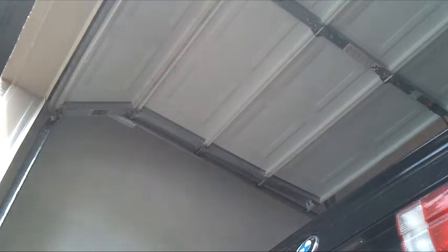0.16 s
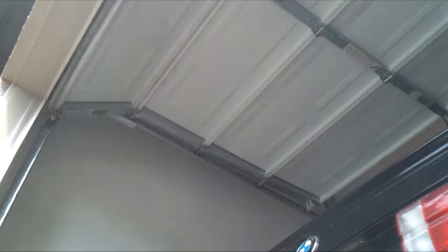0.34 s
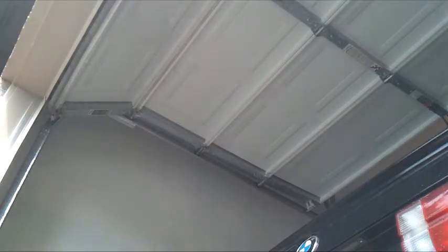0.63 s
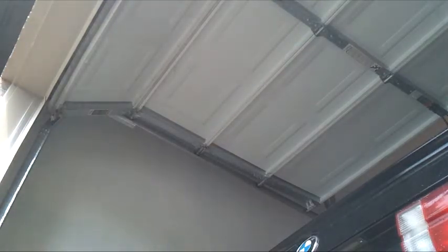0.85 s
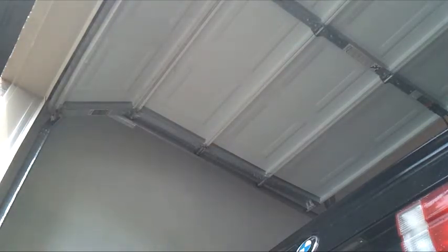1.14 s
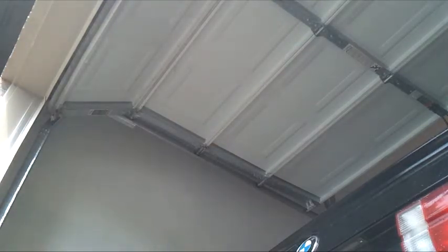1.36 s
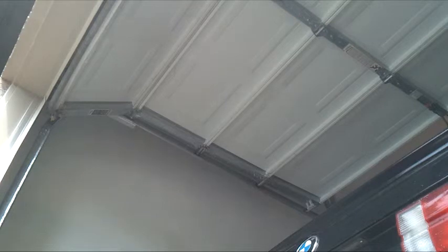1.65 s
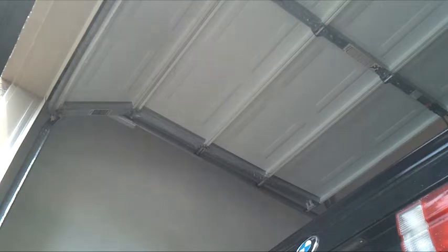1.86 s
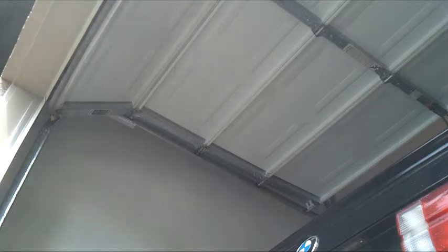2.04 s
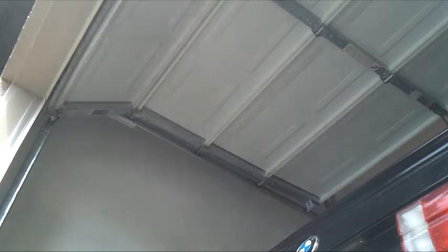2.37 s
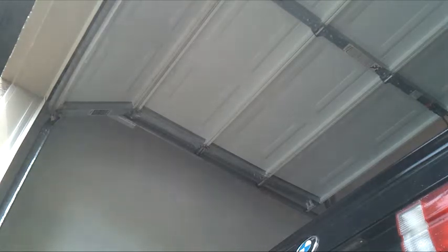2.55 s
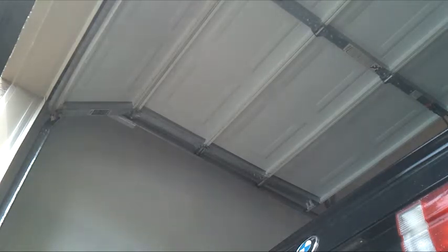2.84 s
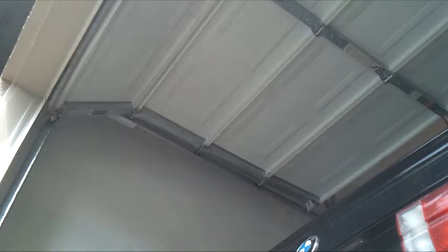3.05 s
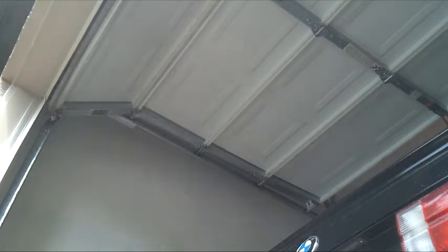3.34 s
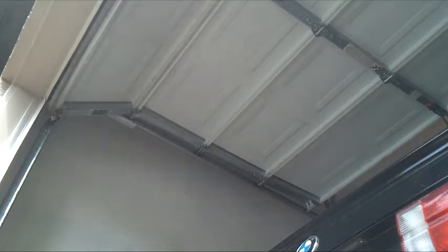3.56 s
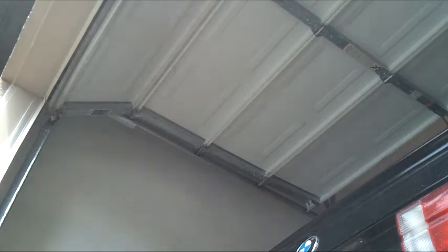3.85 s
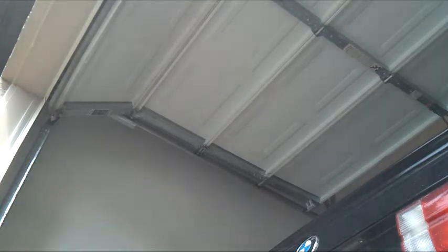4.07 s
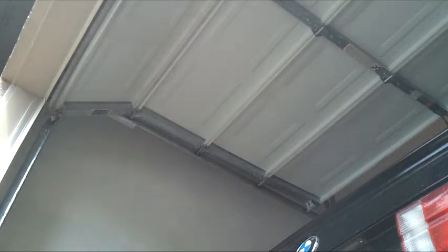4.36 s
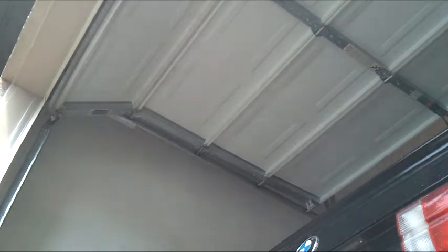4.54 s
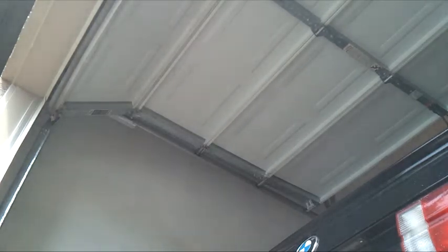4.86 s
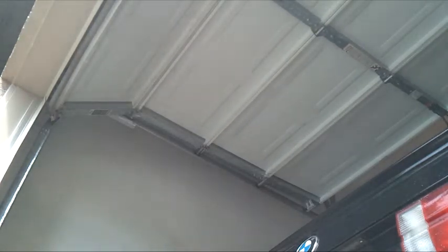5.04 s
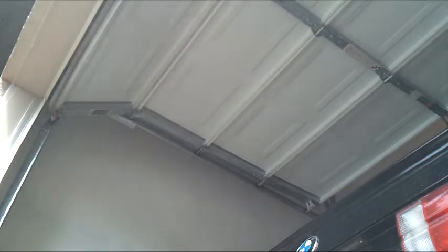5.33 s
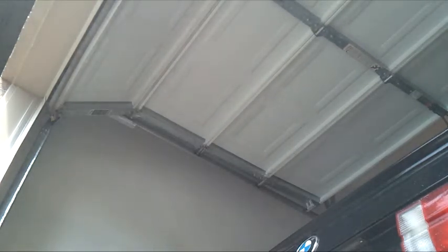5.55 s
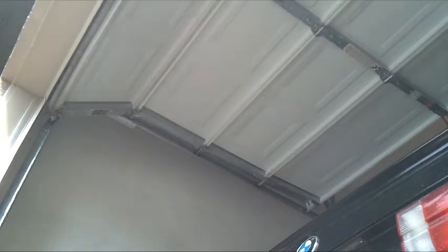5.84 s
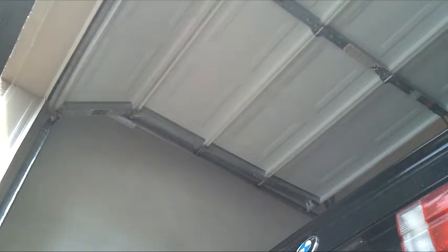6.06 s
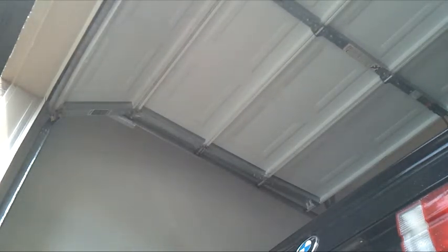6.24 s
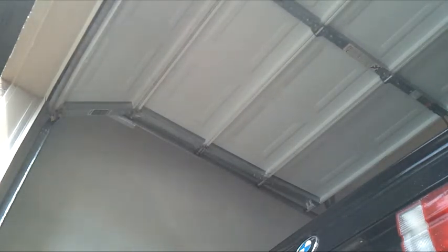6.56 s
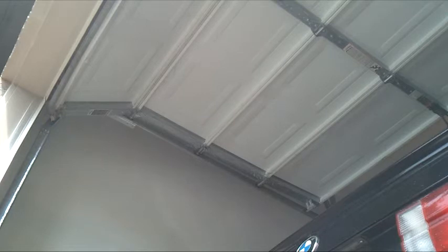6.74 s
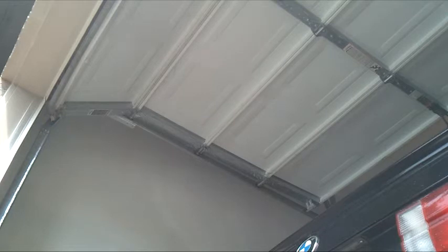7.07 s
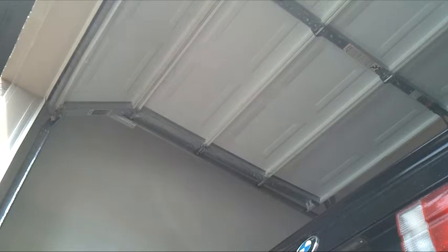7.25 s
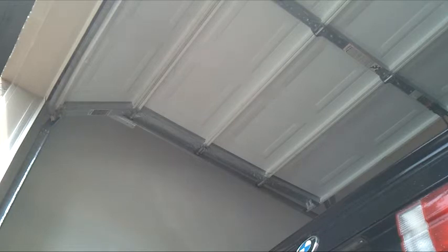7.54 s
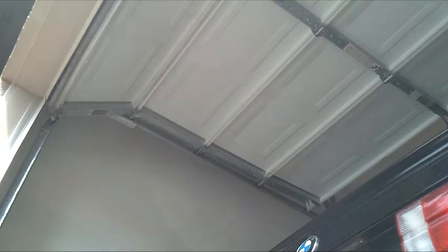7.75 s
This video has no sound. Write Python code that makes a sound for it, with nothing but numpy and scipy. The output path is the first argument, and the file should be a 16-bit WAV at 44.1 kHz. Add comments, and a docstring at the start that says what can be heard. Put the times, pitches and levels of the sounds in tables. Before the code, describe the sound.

A six-cylinder car with a loud exhaust idles in a garage, then revs up with a few pops and a booming rasp.

```python
"""A six-cylinder exhaust in a garage

Heard beside the loud tailpipe, the idle sags and recovers. At 5.5 s the throttle opens with a few
pops and a buffet of gas; the revs climb in two pushes, then start to fall with a burble. The firings
form a pulse train whose harmonics boom as they sweep through fixed resonances of pipe and garage,
most near 270 and 490 Hz. Above them the turbulent gas rasps and hisses."""
import sys
import numpy as np
from scipy import signal
from scipy.fft import rfft, irfft
from scipy.io import wavfile
from scipy.ndimage import uniform_filter1d

SR = 44100
rng = np.random.default_rng(int(sys.argv[2]) if len(sys.argv) > 2 else 0)


def digitize_waveform(pressure):
    """Quantize a signal to 16-bit integers and store it at the path in sys.argv[1].

    Rows of a 2-D input are taken as channels; values are limited to [-1, 1].
    """
    field = np.atleast_2d(pressure).T
    bounded = np.clip(field, -1, 1)
    quanta = np.round(bounded * 32767).astype(np.int16)
    wavfile.write(sys.argv[1], SR, quanta)


N = 348390
TIME = np.arange(N) / SR

# Engine speed. Each row: time in seconds, firings per second.
FIRING_RATE = [(0, 39.1), (.22, 39.6), (.57, 29.2), (.79, 28.8), (1.25, 39.6), (1.46, 41.2), (2.73, 38.5),
               (3.47, 40.5), (4.32, 37.8), (5.5, 39.8), (5.72, 45.8), (5.9, 56), (6.25, 78.2), (6.47, 87.6),
               (6.78, 96.4), (7.05, 103.1), (7.18, 111.7), (7.37, 134), (7.46, 139.8), (7.56, 136.2),
               (7.9, 116.6)]
# Load as the throttle opens. Each row: time in seconds, load from 0 to 1.
ENGINE_LOAD = [(0, 0), (5.45, 0), (5.85, .95), (6.2, 1), (7.9, 1)]
# How hard the engine is pushed. Each row: time in seconds, effort in dB relative to steady running.
ENGINE_EFFORT = [(.12, -2), (.33, -4), (.7, -5), (1.05, 0), (1.43, 1.5), (2.1, -1), (5.45, -1.5),
                 (5.6, 6.5), (5.72, -3), (5.84, 9), (6.03, -3), (6.38, 2.5), (6.62, -2.5), (7.0, -1),
                 (7.12, 6), (7.27, 2.5), (7.45, 3), (7.63, -3.5), (7.78, -1.5), (7.9, 0)]
# Bouts of uneven firing. Each row: middle in seconds, half length in seconds, strength in dB.
UNEVEN_BOUTS = [(5.58, 0.042, -20), (5.665, 0.057, -10), (5.82, 0.077, -12), (5.94, 0.059, -14.5),
                (6.15, 0.049, -14.5), (7.06, 0.076, -14.5), (7.55, 0.045, -5.5), (7.74, 0.07, -14.5),
                (7.87, 0.026, -13)]
# Decay of the garage. Each row: frequency in Hz, time to fall 60 dB in seconds.
GARAGE_T60 = [(80, 0.92), (300, 0.93), (1000, 0.37), (8000, 0.21)]
# Buffets of gas. Each row: middle in seconds, half length in seconds, level in dB.
GUSTS = [(5.55, .06, -53), (5.635, 0.1, -27), (5.79, 0.029, -34)]
# Gas noise spectra, at idle and under load. Each row: frequency in Hz, relative density in dB.
IDLE_HISS = [(100, -62.5), (1200, 3), (2500, -5), (2950, -0.5), (3200, -2.5), (3750, 1.5), (4700, -2),
             (6700, -1.5), (9200, -14), (10000, -21), (11000, -31.5), (12500, -42), (14000, -55)]
LOADED_HISS = [(30, -32), (100, -1.5), (400, -1.5), (1200, 11), (2500, 6), (4000, 0), (5300, 4.5),
               (6700, 1), (9300, -13), (10200, -17.5), (11000, -25), (12500, -48), (14000, -54.5)]
IDLE_RASP = [(20, -41.5), (40, -8.5), (60, 5), (130, 4), (350, 8), (650, 0.5), (800, 3.5), (1000, -1.5),
             (1300, 1), (1650, -9.5), (1950, 0), (2500, -10.5), (4000, -28), (8000, -54)]
LOADED_RASP = [(60, -61.5), (130, -28), (300, 11.5), (600, 2), (900, 6.5), (1200, 8.5), (1600, 4),
               (2000, 2), (2800, -28.5), (4000, -14.5), (8000, -48)]
# Bangs in the pipe. Each row: start in seconds, level in dB.
FUEL_POPS = [(5.624, 1.5), (5.661, -1), (5.688, 0.5), (5.779, 2.5)]
# Pipe resonances. Each row: frequency in Hz, bandwidth in Hz, gain in dB at idle and under load.
PIPE_MODES = [(196.4, 8.1, -1.5, -3), (256.9, 14, 3, -5), (266, 13, -2, -10), (458, 30.6, -2.5, -0.5),
              (501, 25.3, -4.5, 6.5), (620, 10, -39.5, -30), (814, 190, -17.5, -21.5)]
# Cylinders in firing order. Each row: idle delay in firing periods, relative pulse strength at idle,
# excess over the mean pulse under load.
CYLINDER_PULSES = [(0.2376, 0.93, 1), (0.2974, 0.82, 0.17), (0.205, 0.32, -1.3), (0.297, 0.82, 0.18),
                   (0.143, 0.84, -0.12), (0.197, 0.69, -0.21)]
# The fundamental booms where the garage favours it. Each row: firing rate in Hz, level in dB.
FUNDAMENTAL_BOOM = [(30, -72), (40, -77), (65, -58), (86, -62), (95, -41), (103, -48.5), (116, -46.5),
                    (140, -44.5)]
# Resonances of pipe and garage. Each row: centre in Hz, half width in Hz, gain in dB.
DRONE_RESONANCES = [(75, 96, -39), (86, 4.3, -32.5), (167.2, 5.2, -25), (232.3, 12.3, -22.5),
                    (270, 19, -14), (345, 58, -27), (445, 30.5, -18.5), (494.2, 31, -13.5),
                    (546.4, 13.6, -19), (608.4, 12.4, -19), (715, 38, -27), (806, 31, -21.5)]
# Firing harmonics 2 to 8. Each row: gain in dB at idle and under load, dB per dB of effort under load.
FIRING_HARMONICS = [(-4, 2.5, 0), (-12, -9, -2), (-19.5, 2, .5), (-16, -7, 0.5), (-13, 0, 1),
                    (-21.5, -8.5, 0.1), (-24, -9.5, 1.45)]


def amp(db):
    """Amplitude ratio of a level in decibels."""
    return 10 ** (np.asarray(db) / 20)


def curve(rows):
    """Linear interpolation in time."""
    return np.interp(TIME, *np.transpose(rows))


def spectrum_at(points, hz):
    """Interpolation on a logarithmic frequency axis."""
    f, value = np.transpose(points)
    return np.interp(np.log(hz + 1), np.log(f), value)


def bells(rows, axis):
    """A sum of Gaussian bells in time or frequency."""
    return sum(amp(db) * np.exp(-((axis - middle) / half) ** 2) for middle, half, db in rows)


def colour(x, points):
    """Spectral shaping, scaled to rms 1."""
    y = irfft(rfft(x) * amp(spectrum_at(points, np.fft.rfftfreq(N, 1 / SR))), N)
    return y / y.std()


def levelled(x, size):
    """Division by the running rms removes slow swells and keeps faster throbs."""
    return x / np.sqrt(uniform_filter1d(uniform_filter1d(x ** 2, size), size) + 1e-12)


def wander(hz):
    """Low-pass random fluctuation of rms 1."""
    y = irfft(rfft(rng.standard_normal(N)) / (1 + (np.fft.rfftfreq(N, 1 / SR) / hz) ** 4), N)
    return y / y.std()


def garage(x, wet_db, echoes_per_s=2000):
    """Reverberation: sparse reflections decay exponentially, each band at its own rate."""
    size = SR // 2
    echoes = rng.choice([-1., 1.], size) * (rng.random(size) < echoes_per_s / SR) * (TIME[:size] > .004)
    hz, t, bands = signal.stft(echoes, SR, nperseg=256)
    decay = amp(-60 * t / spectrum_at(GARAGE_T60, hz)[:, None])
    tail = signal.istft(bands * decay, SR, nperseg=256)[1]
    return x + amp(wet_db) * signal.fftconvolve(x, tail / np.linalg.norm(tail))[:N]


def gust():
    """Turbulent pressure: exhaust gas blown on the microphone makes a low buffet."""
    rumble = colour(rng.standard_normal(N), [(10, -13), (30, 3), (90, 5.5), (160, 2), (500, -57.5)])
    return bells(GUSTS, TIME) * rumble


def hiss(cycles, load, idle_depth=0.015, load_depth=0.18, crank=0.082, cam=0.045, flutter=.1):
    """Amplitude modulation: hiss pulses with each firing, the crank (3 firings) and camshaft (6)."""
    angle = 2 * np.pi * cycles
    firing = 1 + (idle_depth + load * (load_depth - idle_depth)) * np.cos(angle)
    shafts = 1 + crank * np.cos(angle / 3) + cam * np.cos(angle / 6 - 1)
    noise = rng.standard_normal(N) * firing * shafts * (1 + flutter * wander(250))
    blend = np.sqrt(1 - load) * colour(noise, IDLE_HISS) + np.sqrt(load) * colour(noise, LOADED_HISS)
    return garage(blend, wet_db=-9.5)


def rasp(cycles, load, depth=0.2, snarl_db=1, uneven=0.18):
    """Jet noise surges at each firing; under load, steep pulse fronts add a harmonic snarl."""
    angle = 2 * np.pi * cycles
    jet = rng.standard_normal(N) * (1 + depth * np.cos(angle)) * (1 + 0.053 * np.cos(angle / 3))
    crank = (cycles + 0.0069 * wander(40)) / 3
    fronts = np.zeros(N)
    # every third crank order is a firing harmonic; unequal cylinders fill in the others
    for order in range(19, 46):
        strength = (uneven if order % 3 else 1) / order * (1 + .45 * wander(4))
        fronts += strength * np.cos(2 * np.pi * (order * crank + rng.random()))
    snarl = amp(snarl_db) * levelled(colour(fronts, LOADED_RASP), size=8000)
    blend = (1 - load) ** 2 * colour(jet, IDLE_RASP) + load * (colour(jet, LOADED_RASP) + snarl)
    return levelled(garage(blend, wet_db=-5.5), size=4000)


def gas_noise(cycles, rate, load, effort_db, bouts, idle_db=-34.5, rasp_load_db=-26.5, hiss_top_db=-22):
    """Turbulent flow: rasp follows the effort; hiss rises at high revs and flares in each bout."""
    rasp_gain = amp((1 - load) * (idle_db + 0.26 * effort_db) + load * (rasp_load_db + effort_db))
    high_revs = 1 / (1 + np.exp((99 - rate) / 6))  # a soft step at 99 firings per second
    hiss_db = idle_db + high_revs * (hiss_top_db - idle_db) + 0.12 * effort_db
    hiss_gain = np.hypot(amp(hiss_db), amp(-19) * load * bouts)
    drift = amp(0.65 * wander(7))
    return drift * (rasp_gain * rasp(cycles, load) + hiss_gain * hiss(cycles, load))


def pops(low_hz=275, high_hz=500, rise_s=0.0018, ring_s=0.0056, crack_s=0.00072, dull_hz=4200):
    """Impulse excitation: fuel bangs with a dull crack, and two pipe resonances ring briefly."""
    out, t = np.zeros(N), TIME[:SR // 20]
    ring = np.sin(2 * np.pi * low_hz * t) + amp(-6) * np.sin(2 * np.pi * high_hz * t)
    ring *= (1 - np.exp(-t / rise_s)) * np.exp(-t / ring_s)
    for start, db in FUEL_POPS:
        burst = rng.standard_normal(len(t)) * np.exp(-t / crack_s)
        crack = signal.lfilter(*signal.butter(4, dull_hz, fs=SR), burst)
        out[int(start * SR):][:len(t)] += amp(db) * (ring / abs(ring).max() + amp(-16) * crack)
    # the narrow tailpipe radiates little bass
    radiated = signal.lfilter(*signal.butter(2, 130, "highpass", fs=SR), out)
    return garage(radiated, wet_db=-8)


def pipe(x, load):
    """Modal resonance: the gas column rings; load shifts the weight to the modes near 500 Hz."""
    modes = np.zeros(N)
    for hz, width, idle_db, load_db in PIPE_MODES:
        ring = signal.lfilter(*signal.iirpeak(hz, hz / width, SR), x)
        modes += amp(idle_db + load * (load_db - idle_db)) * ring
    return signal.sosfilt(signal.butter(4, [185, 850], "bandpass", fs=SR, output="sos"), modes)


def burble(cycles, load, scatter=.26, jitter_s=.00018, puff_gain=.045, puff_cycles=.3):
    """Source and filter: pulses from unequal cylinders, each with a turbulent puff, excite the pipe."""
    firing = np.arange(int(cycles[-1]) - 1)
    delay, idle, excess = np.array(CYLINDER_PULSES)[firing % len(CYLINDER_PULSES)].T
    loaded = np.interp(firing, cycles, load)
    # combustion is steadier under load
    chance = rng.standard_normal((len(firing), 2)) * (1 - .4 * loaded)[:, None]
    start_s = np.interp(firing + delay * (1 - loaded), cycles, TIME) + jitter_s * chance[:, 0]
    onsets = np.clip(start_s * SR, 0, N - 1).astype(int)
    pulses = np.zeros(N)
    pulses[onsets] = idle + loaded * (excess - idle) + scatter * chance[:, 1]
    latest = onsets[np.maximum(np.searchsorted(onsets, np.arange(N), "right") - 1, 0)]
    puffs = pulses[latest] * np.exp(-abs(cycles - cycles[latest]) / puff_cycles) * rng.standard_normal(N)
    exhaust = pipe(pulses + puff_gain * puffs, load)
    return levelled(garage(exhaust, wet_db=1), size=6000)


def drone(cycles, rate, load, effort_db, idle_waver=0.063, load_waver=0.028, valley_db=-45):
    """Forced resonance: each harmonic of the mean firing pulse swells as it crosses a mode."""
    waver = idle_waver + load * (load_waver - idle_waver)
    phase = cycles + 0.011 * load * wander(34)
    hz = np.arange(1000.)
    response = amp(valley_db) + bells(DRONE_RESONANCES, hz)
    out = amp(spectrum_at(FUNDAMENTAL_BOOM, rate)) * np.cos(2 * np.pi * phase)
    for k, (idle_db, load_db, push) in enumerate(FIRING_HARMONICS, 2):
        drive = amp((1 - load) * (idle_db + 0.9 * effort_db) + load * (load_db + push * effort_db))
        resonance = np.interp(k * rate, hz, response)
        flicker = 1 + k * waver * wander(20)
        out += drive * resonance * flicker * np.cos(2 * np.pi * (k * phase + rng.random()))
    return np.sqrt(2) * out


def exhaust_note(cycles, rate, load, effort_db, bouts, idle_db=-29, load_db=-28, break_up_db=-8.5):
    """Superposition of drone and burble; the burble calms under a hard pull and swells in each bout."""
    steady = amp((1 - load) * (idle_db + effort_db) + load * (load_db - 0.94 * effort_db))
    chug = 1 + 0.14 * (1 - load) * np.cos(np.pi * cycles)  # at half the firing rate
    burble_gain = np.hypot(steady, amp(-4) * bouts) * chug
    drone_gain = 1 / (1 + (bouts / amp(break_up_db)) ** 2)
    return drone_gain * drone(cycles, rate, load, effort_db) + burble_gain * burble(cycles, load)


def scene():
    """One firing phase, the integral of the rate, locks the gas noise to the exhaust note."""
    rate = curve(FIRING_RATE)
    cycles = np.cumsum(rate) / SR
    engine = cycles, rate, curve(ENGINE_LOAD), curve(ENGINE_EFFORT), bells(UNEVEN_BOUTS, TIME)
    return (exhaust_note(*engine) + gas_noise(*engine) + pops() + gust())[None]


def record(dry, threshold_db=-15, squeeze=0.43, follow_s=0.018, notch_hz=(6950, 9060), top_hz=13000):
    """Compression holds loud revs down, soft clipping rounds peaks, a filter notches and limits treble."""
    pole = np.exp(-1 / (follow_s * SR))
    power_db = 10 * np.log10(signal.lfilter([1 - pole], [1, -pole], dry ** 2) + 1e-12)
    held = dry * amp(-squeeze * np.maximum(power_db - threshold_db, 0))
    rounded = held / (1 + abs(held) ** 8) ** (1 / 8)
    taps = signal.firwin(1023, [*notch_hz, top_hz], window=("kaiser", 7), fs=SR)
    return signal.oaconvolve(rounded, taps[None], "same")


dry = scene()
out = record(dry)
digitize_waveform(out)
```